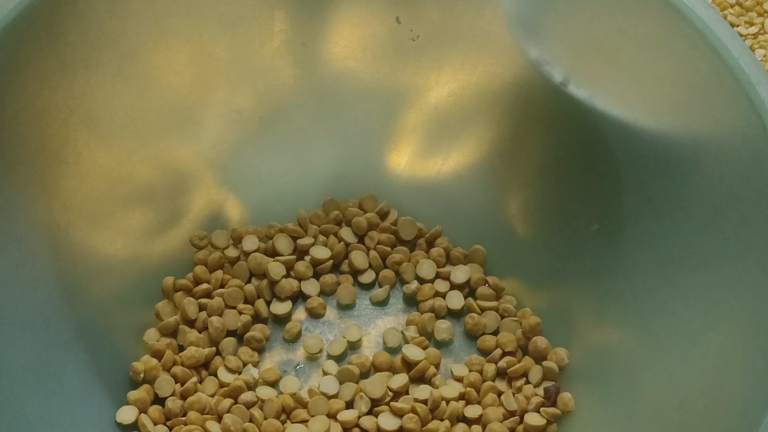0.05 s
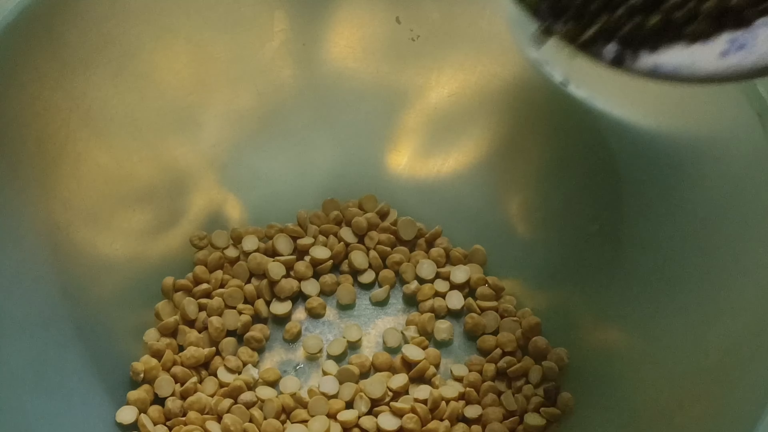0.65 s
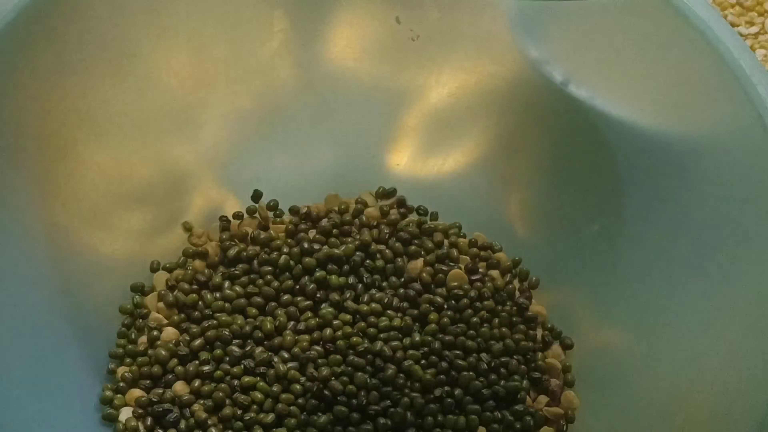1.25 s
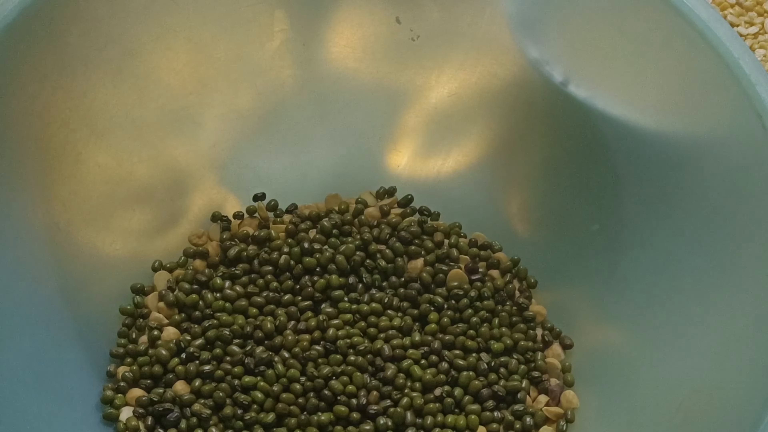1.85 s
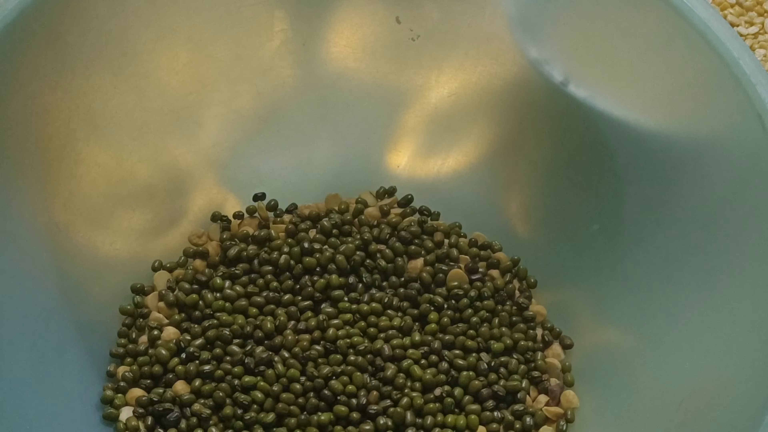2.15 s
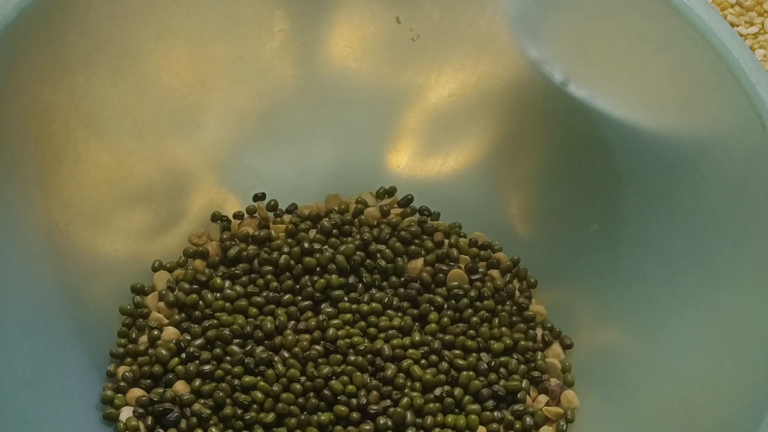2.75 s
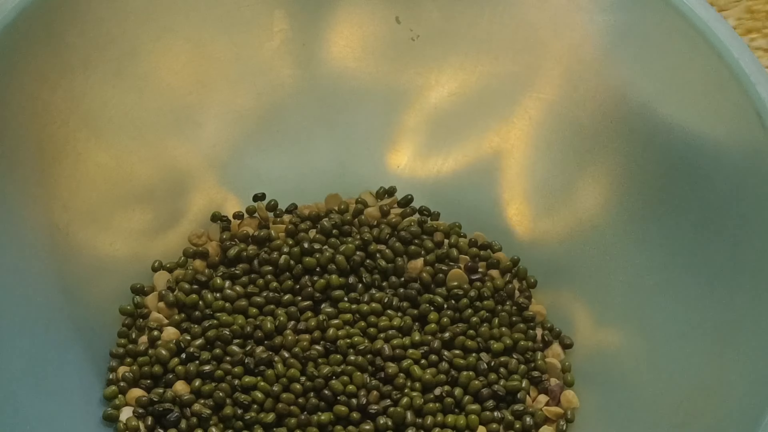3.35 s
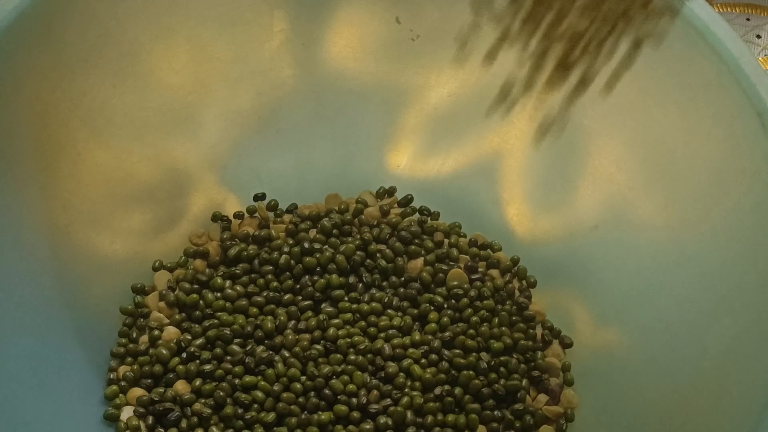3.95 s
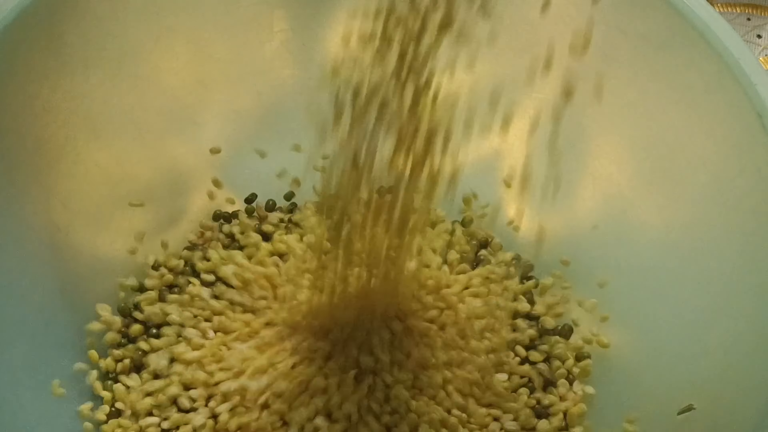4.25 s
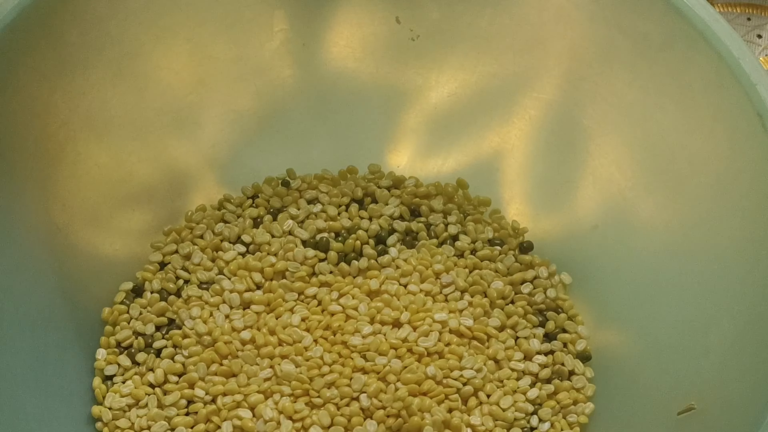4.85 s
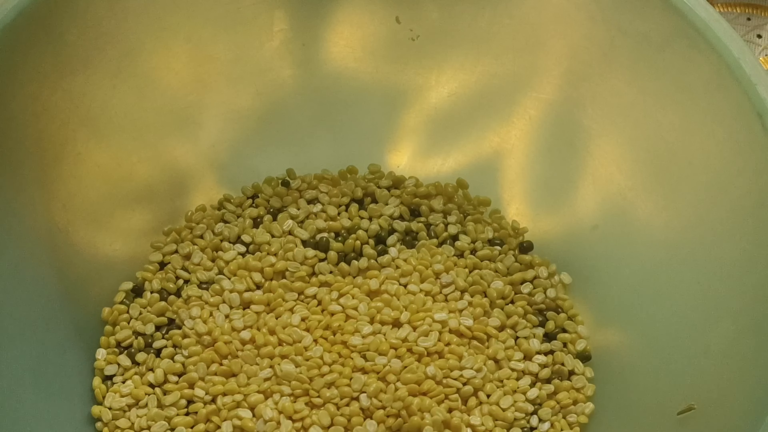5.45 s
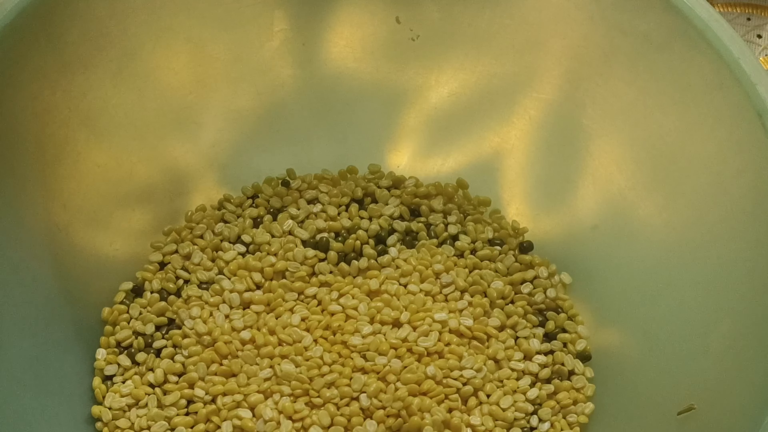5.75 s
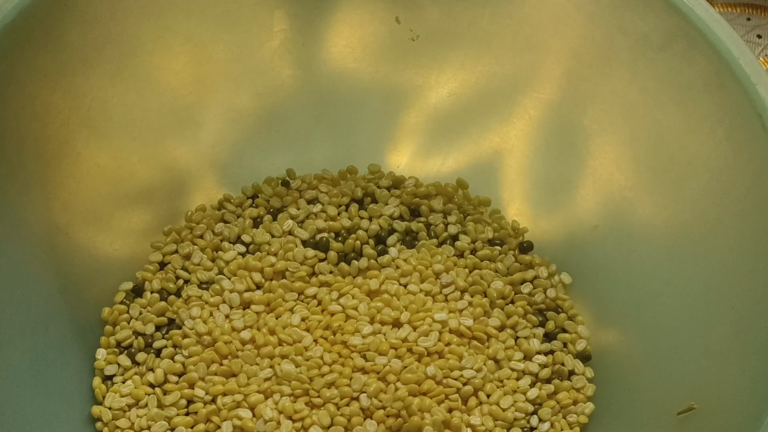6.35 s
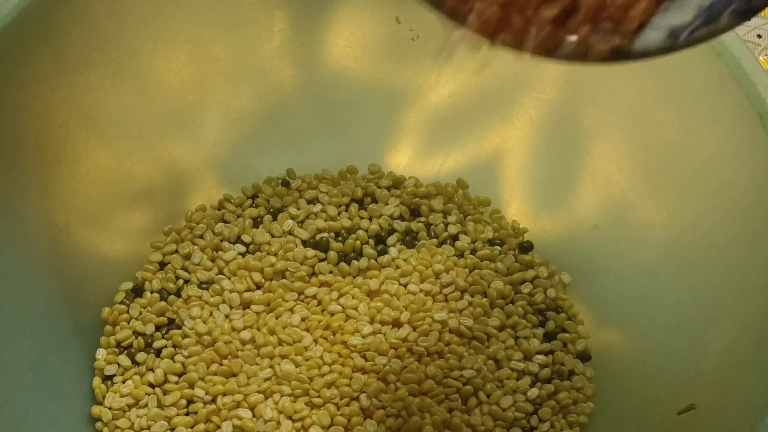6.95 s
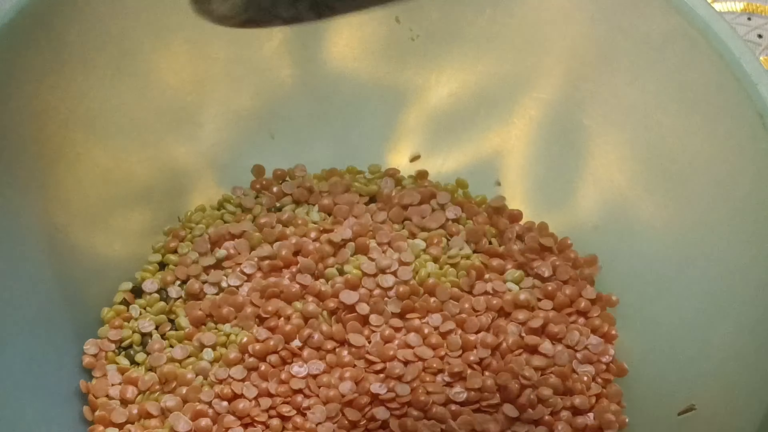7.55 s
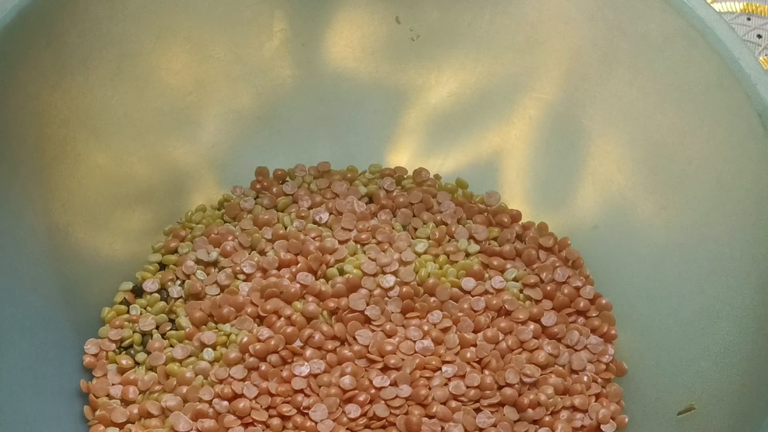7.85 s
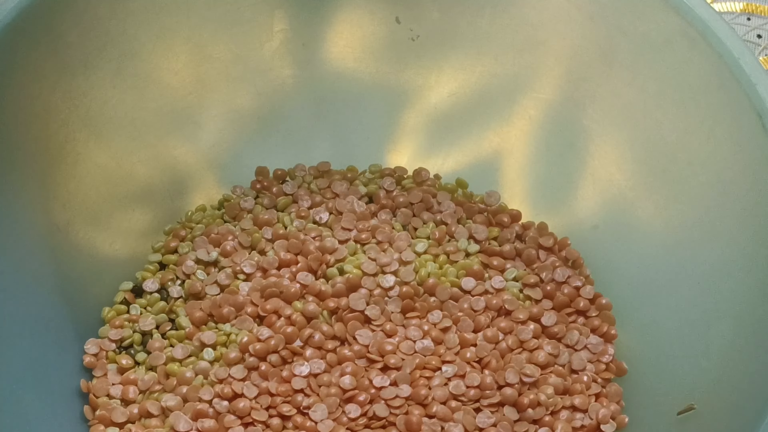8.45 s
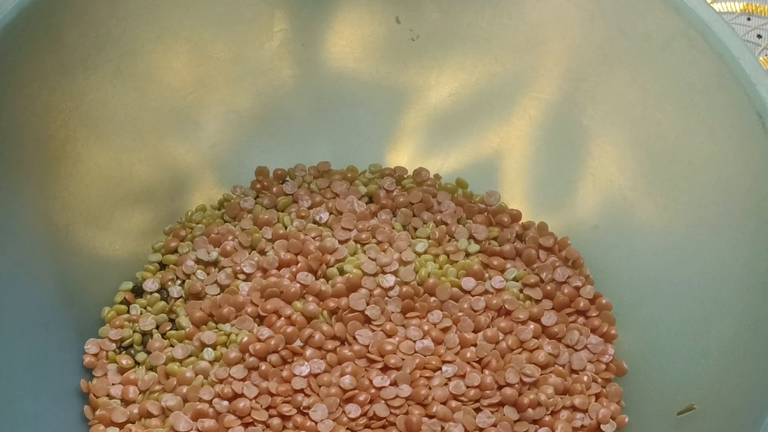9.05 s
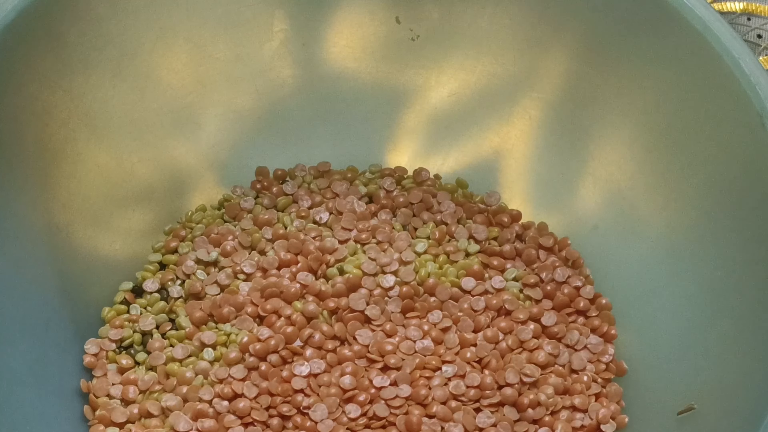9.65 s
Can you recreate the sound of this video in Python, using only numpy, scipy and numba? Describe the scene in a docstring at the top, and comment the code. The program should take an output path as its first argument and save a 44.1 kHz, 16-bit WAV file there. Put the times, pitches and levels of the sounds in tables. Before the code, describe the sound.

Dry lentils rattle into a large plastic bowl in three short pours, with light scrapes, ticks and cup knocks over a low hum.

```python
"""Dry lentils rain from a cup into a large plastic bowl in three short pours, close to a stereo microphone.
Each time they first scrape along the cup wall and ring the air in the cup, then hail onto the heap
and ring the bowl's floor and walls. Between and after the pours, stray lentils tick and the cup is
knocked on the left; once, a hand bumps the bowl. The room is a small kitchen with a short tail,
and a motor hums behind it all over a steady rush of air."""
import sys
import numpy as np
from scipy import signal
from scipy.fft import rfft, irfft
from scipy.io import wavfile
from numba import njit

SR = 44100
rng = np.random.default_rng(int(sys.argv[2]) if len(sys.argv) > 2 else 0)


def master_out(mix):
    """Clip the mix to full scale and print it as 16-bit PCM to the path in sys.argv[1]."""
    frames = np.transpose(np.atleast_2d(mix))
    ceiling = np.clip(frames, -1, 1)
    pcm = np.round(ceiling * 32767).astype(np.int16)
    wavfile.write(sys.argv[1], SR, pcm)


N = 428652
T = np.arange(N) / SR

# Pours into the bowl. Each row: start in seconds, attack in seconds, time until the ebb in seconds,
# release in seconds, relative level in dB, treble in dB, landings per second, the bowl's first pitch
# in Hz, time to load the bowl in seconds, hollow thud in dB.
BOWL_POURS = [ (0.800, .04, 0.24, 0.32, -18, -1, 22000, 1620, 0.47, 1),
              (4.067, 0.049, 0.19, 0.36, -24, -2.5, 7000, 1390, 0.12, -29),
              (7.104, 0.039, .2, .43, -31, 1.5, 11000, 2300, 0.15, -6), ]
# Single lentils hitting the heap or the bowl. Each row: start in seconds, relative level in dB.
SINGLE_LANDINGS = [(.8055, 1), (.8095, 5), (.8135, -1), (.838, 1), (.843, 4), (4.437, -6), (4.508, -6),
                   (4.517, -13), (4.594, -20.5), (7.111, -17), (7.1205, -10), (7.1542, -9), (7.521, -7),
                   (7.538, -9.5), (7.5735, -14)]
# Colour of the landing lentils, as heard through the microphone. Each row: frequency in Hz, gain in dB.
HEAP_COLOUR = [(500, -4), (2000, -3.5), (2800, -1.5), (3800, 0.5), (4400, 0.5), (5200, 1), (7300, 1.5),
               (8400, -4), (10900, -6.5), (11900, 0), (13500, -0.5), (16000, -5)]
# Low modes of the loaded bowl. Each row: frequency in Hz, width in Hz, gain in dB.
BOWL_MODES = [(297.4, 140, -19), (793, 280, -9.5)]
# Slides in the cup, each ringing it by its own amount. Each row: start in seconds, swell in seconds,
# time until the run-out in seconds, run-out in seconds, relative level in dB, contacts per second,
# low cut in Hz, ring of the cup in dB.
CUP_SLIDES = [ (0.0, 0.0013, 0.0048, 0.041, -51.5, 5400, 2500, 3),
              (0.431, 0.11, 0.42, .05, -44, 8500, 4614, -9), (0.653, 0.12, 0.15, .05, -34, 7600, 4862, -3),
              (2.329, 0.042, .055, 0.033, -58, 1300, 4000, 10),
              (2.456, 0.0062, 0.0076, 0.017, -51.5, 800, 3500, 5),
              (3.734, 0.2, 0.33, 0.043, -41, 12000, 3580, 2.5),
              (4.802, 0.036, .06, 0.041, -58, 1700, 3700, -4),
              (4.91, 0.01, 0.031, 0.1, -57.5, 2000, 3700, -3), (6.717, 0.054, .12, .03, -65, 2000, 3700, 4),
              (6.818, 0.14, .29, .06, -42, 14500, 3500, 6),
              (8.49, 0.11, 0.11, 0.039, -49.5, 1200, 3740, -4),
              (8.643, .008, 0.13, 0.018, -57, 1300, 3700, 11),
              (8.89, 0.023, .025, .07, -54, 3400, 3720, -7), ]
# Single lentils ticking in the cup. Each row: start in seconds, relative level in dB.
CUP_TICKS = [(.399, -50), (0.647, -22), (.658, -33), (0.686, -27.5), (1.308, -32), (1.325, -28),
             (1.33, -25), (2.0363, -47.5), (2.32, -37.5), (2.3797, -37), (2.4624, -33.5), (3.808, -33.5),
             (4.8015, -43), (4.824, -42), (6.8613, -33.5), (7.8565, -45), (8.574, -34), (8.6534, -33),
             (8.684, -35), (8.983, -28.5)]
# Colour of the dry scrape, as heard through the microphone. Each row: frequency in Hz, gain in dB.
SCRAPE_COLOUR = [(2500, -24), (3700, -10), (5200, -7), (6000, -2), (7900, -1), (9000, -7), (11200, -7),
                 (12000, -1), (13500, -4), (16000, -6)]
# Resonances of the air in the cup. Each row: frequency in Hz, width in Hz, gain in dB.
CUP_AIR_MODES = [(4070, 170, 8), (6290, 190, 8), (6930, 240, 7), (8300, 220, 1), (9900, 260, -6),
                 (11980, 280, 1), (13500, 400, -6)]
# Knocks on the cup. Each row: start in seconds, level in dB, pitch in Hz, swell in seconds,
# then the offsets in dB of the crack and of the lingering note.
CUP_KNOCKS = [(1.9553, -14.5, 1237, 0.0027, -23.5, -34), (2.2211, -8.5, 1082, 0.0024, -15, -22.5),
              (2.461, -28.5, 890, 0.0012, -16, -22), (8.7225, -18, 1092, 0.0032, -13.5, -17),
              (8.766, -11.5, 1113, 0.0025, -17, -28), (8.7768, -21, 1260, 0.0042, -10, -24)]
# Modes of the cup wall under a knock. Each row: frequency in Hz, width in Hz, gain in dB.
CUP_WALL_MODES = [(1980, 430, 7), (2460, 160, 2), (3750, 300, -0.5), (6650, 270, 1.5), (7630, 560, -3),
                  (9510, 220, -7), (12580, 630, -29.5)]
# Soft bumps of a hand on the bowl. Each row: start in seconds, level in dB, pitch in Hz.
HAND_BUMPS = [(3.245, -40.5, 148), (3.249, -42.5, 241)]
# Partials of the motor's hum. Each row: multiple of the shaft rate, rms level in dB.
MOTOR_PARTIALS = [(1, -57), (2, -64), (3, -54.5), (5, -63), (6, -63), (8, -72)]
# Colour of the room tone, mid and side. Each row: frequency in Hz, relative level in dB.
AIR_MID_COLOUR = [(25, -19), (70, -16.5), (92, 5.5), (140, 1), (195, -7), (260, -4), (480, -5), (700, -5.5),
                  (1400, -14), (3000, -21.5), (5600, -35.5), (7400, -31.5), (9500, -45.5), (16000, -46.5)]
AIR_SIDE_COLOUR = [(25, -44.5), (120, -16.5), (300, -10.5), (650, 3.5), (1000, -1.5), (1800, -8.5),
                   (3000, -18.5), (5600, -30.5), (7400, -27), (9000, -43), (11000, -41.5), (12200, -41),
                   (16000, -55)]


def pouring(loaded_hz=2130, body_db=7, treble_db=8.5, dulling=.193, thud_fade_db_per_s=27):
    """Lentils rain on the heap, just right of centre; the bowl's floor rings, weak below its pitch."""
    hail, floor_hz, thud_gain = np.zeros((2, N)), np.full(N, float(loaded_hz)), np.zeros(N)
    for start, attack_s, ebb_s, release_s, db, bright_db, per_s, first_hz, load_s, thud_db in BOWL_POURS:
        span, age = since(start)
        ebb_db = -37.5 * (np.maximum(age - ebb_s, 0) / release_s) ** 2.13  # a pour ends ever faster
        flow = (1 - np.exp(-age / attack_s)) * undb(db + ebb_db)
        hits = contacts(len(age), per_s, spread_db=3.3)
        body = signal.sosfiltfilt(signal.butter(2, 8000, fs=SR, output="sos"), hits)
        # harder landings are brighter; the stragglers land softly
        treble = undb(treble_db + bright_db + dulling * ebb_db) * (hits - body)
        hail[:, span] = flow * (undb(body_db) * body + treble)
        floor_hz[span] = first_hz + (loaded_hz - first_hz) * ease(age / load_s)
        thud_gain[span] = undb(thud_db - thud_fade_db_per_s * age)
    singles = undb(-1) * strikes(SINGLE_LANDINGS, chatter_s=.0018, chatter_db=5)
    heap = ring(hail + singles, click(HEAP_COLOUR))
    rattle = np.array([resonant_highpass(side, floor_hz, damping=.26) for side in heap])
    rattle = np.array([resonant_highpass(side, .85 * floor_hz, damping=1.69) for side in rattle])
    # the bowl also gives a hollow thud, set per pour and fading as it runs
    hollow = band(heap, (1250, 1950), "bandpass", order=1)
    thud = thud_gain * band(hollow, 560, "highpass")
    low_ring = ring(heap, resonances(BOWL_MODES))
    return pan(bowl_walls(rattle - thud + low_ring), right_db=2)


def bowl_walls(x, bounce_db=-8, fade_s=.005, size=900):
    """Sound bounces to and fro inside the bowl, which gives every click the same short, hollow ring."""
    t = np.arange(size) / SR
    bounces = rng.standard_normal((2, size)) * np.exp(-t / fade_s) * (t > .001)
    return (x + ring(x, at_energy(bounces, bounce_db))) / np.sqrt(1 + undb(bounce_db) ** 2)


def sliding(gain_db=4):
    """Lentils scrape and tick along the tilted cup, near centre: each slide swells and runs out."""
    out = np.zeros((2, N))
    middles = np.array([start + length_s / 2 for start, _, length_s, *_ in CUP_SLIDES])
    for k, (start, swell_s, length_s, run_out_s, db, per_s, low_hz, ring_db) in enumerate(CUP_SLIDES):
        # a tick rings the cup as the nearest slide does
        ticks = [tick for tick in CUP_TICKS if np.argmin(abs(middles - tick[0])) == k]
        force = undb(-1) * strikes(ticks, chatter_s=.003, chatter_db=15.5)
        span, age = since(start)
        flow = ease(age / swell_s) * np.exp(-np.maximum(age - length_s, 0) / run_out_s)
        force[:, span] += undb(gain_db + db) * flow * contacts(len(age), per_s, spread_db=1)
        out += ring(force, cup_response(low_hz, ring_db))
    return pan(out, right_db=1)


def cup_response(low_hz, ring_db):
    """One contact inside the cup: a dry scrape plus the ring of the air in it; energy 1."""
    contact = click(SCRAPE_COLOUR) + undb(ring_db) * resonances(CUP_AIR_MODES)
    response = band(contact, low_hz, "highpass", order=4)
    return response / np.sqrt(np.sum(response ** 2))


def contacts(length, per_s, spread_db, max_count=30000, max_lag=16):
    """A hail of tiny impacts, rms 1; each has its own place and so its own lag between the capsules."""
    when, strength, polarity, place = rng.random((max_count, 4))[:int(per_s * length / SR)].T
    at = (when * (length - 2 * max_lag)).astype(int) + max_lag
    force = undb(spread_db * np.minimum(-np.log(1 - strength), 5)) * np.sign(polarity - .5)
    lag = np.round((2 * place - 1) * max_lag).astype(int)
    return unit(np.array([np.bincount(at, force, length), np.bincount(at + lag, force, length)]))


def strikes(rows, chatter_s, chatter_db, size=2048):
    """Single impacts, each a sharp spike with a short chatter as it settles."""
    out, t = np.zeros((2, N)), np.arange(size) / SR
    for start, db in rows:
        hit = at_energy(rng.standard_normal((2, size)) * np.exp(-t / chatter_s), chatter_db)
        hit[[0, 1], rng.integers(0, 10, 2)] += 1  # the spike, timed apart for each capsule
        at = int(start * SR)
        out[:, at:at + size] += undb(db) * hit
    return out


def knocking(far_db=-8, far_lag_s=.00029, linger_s=.038):
    """The cup is knocked left of the microphone: a hollow note lingers under the clack of its wall."""
    note, cracks = np.zeros(N), []
    for start, db, hz, swell_s, crack_db, linger_db in CUP_KNOCKS:
        note += hollow_note(start, db, hz, swell_s) + hollow_note(start, db + linger_db, hz, linger_s)
        cracks.append((start + .0006, db + crack_db))
    force = strikes(cracks, chatter_s=.0025, chatter_db=11)
    clack = undb([[12], [9]]) * ring(force, resonances(CUP_WALL_MODES))
    far_note = undb(far_db) * np.interp(T - far_lag_s, T, note)
    return np.array([note, far_note]) + clack


def bumping():
    """A hand bumps the bowl: soft, low notes, dead centre."""
    return sum(hollow_note(start, db, hz, swell_s=.011) for start, db, hz in HAND_BUMPS)


def hollow_note(start, db, hz, swell_s, size=8192):
    """One struck mode builds to its peak at swell_s and dies away."""
    note, t = np.zeros(N), np.arange(size) / SR
    envelope = (t / swell_s * np.exp(1 - t / swell_s)) ** 2
    at = int(start * SR)
    note[at:at + size] = undb(db) * envelope * np.sin(2 * np.pi * hz * t)
    return note


def kitchen(x, wet_db, t60_s, echo_s, echo_db, size=22050):
    """Direct sound, an early bounce off the near surfaces, then a short, dull tail from all sides."""
    t = np.arange(size) / SR
    tail = rng.standard_normal((2, size)) * np.exp(-np.log(1000) * t / t60_s) * (t > .005)
    tail = band(at_energy(tail, wet_db), 7000, "lowpass", order=1)
    mid = x.sum(0) / np.sqrt(2)
    echo = undb(echo_db) * np.roll(x, int(echo_s * SR), axis=1)
    return x + echo + ring(np.tile(mid, (2, 1)), tail)


def motor(shaft_hz=56.2):
    """A motor hums in the background; each partial flutters slightly in level and phase."""
    hum = np.zeros(N)
    for multiple, db in MOTOR_PARTIALS:
        amplitude = np.sqrt(2) * undb(db + 1.3 * wander(per_s=12))
        drift = .3 * wander(per_s=7)
        hum += amplitude * np.sin(2 * np.pi * (multiple * shaft_hz * T + rng.random()) + drift)
    return hum


def room_tone(rms_db=-47.5):
    """A steady rush of air all round the microphone, with mid and side equally loud."""
    mid, side = (unit(irfft(rfft(rng.standard_normal(N)) * gains(colour, N), N))
                 for colour in (AIR_MID_COLOUR, AIR_SIDE_COLOUR))
    return undb(rms_db) * np.array([mid + side, mid - side])


def undb(db):
    """Decibels to gain."""
    return 10 ** (np.asarray(db) / 20)


def unit(x):
    """Scale to rms 1."""
    return x / np.sqrt(np.mean(x ** 2))


def at_energy(x, db):
    """Scale a stereo pair to a mean energy per channel, in dB."""
    return x * undb(db) / np.sqrt(np.sum(x ** 2) / 2)


def pan(x, right_db):
    """Tip the balance to the right by right_db."""
    return x * undb([[-right_db / 2], [right_db / 2]])


def gains(colour, size):
    """Gain of a (Hz, dB) colour on the bins of an FFT."""
    hz, db = np.transpose(colour)
    return undb(np.interp(np.log(np.fft.rfftfreq(size, 1 / SR) + 1), np.log(hz), db))


def click(colour, size=512):
    """Shortest causal click with the given colour."""
    cepstrum = irfft(np.log(gains(colour, size)))
    cepstrum[1:size // 2] *= 2
    cepstrum[size // 2 + 1:] = 0
    return irfft(np.exp(rfft(cepstrum)))


def resonances(modes, size=512):
    """Ring of damped modes after one impact."""
    t = np.arange(size) / SR
    return sum(undb(db) * 2 * np.pi * width / SR * np.exp(-np.pi * width * t) * np.cos(2 * np.pi * hz * t)
               for hz, width, db in modes)


def ring(x, response):
    """Play both channels through an impulse response."""
    return signal.oaconvolve(x, np.atleast_2d(response), axes=1)[:, :x.shape[1]]


def band(x, hz, kind, order=2):
    """Butterworth filter."""
    return signal.sosfilt(signal.butter(order, hz, kind, fs=SR, output="sos"), x)


@njit
def resonant_highpass(x, hz, damping):
    """State-variable high-pass whose corner follows hz."""
    high, band_state, low_state = np.empty(len(x)), 0., 0.
    for i in range(len(x)):
        g = np.tan(np.pi * hz[i] / SR)
        mid = (band_state + g * (x[i] + 1e-18 - low_state)) / (1 + g * (g + damping))
        low = low_state + g * mid
        high[i] = x[i] - damping * mid - low
        band_state, low_state = 2 * mid - band_state, 2 * low - low_state
    return high


def wander(per_s):
    """Slow random wander with a spread near 1."""
    knots = rng.standard_normal(400)
    return np.sqrt(3 / 2) * np.interp(T * per_s, np.arange(len(knots)), knots)


def ease(x):
    """Smooth step from 0 to 1 as x goes from 0 to 1."""
    return np.sin(np.pi / 2 * np.clip(x, 0, 1)) ** 2


def since(start, longest_s=.8):
    """The samples of one pour or slide, and their age in seconds."""
    span = (T >= start) & (T < start + longest_s)
    return span, T[span] - start


def scene():
    """The lentils are close to the microphone; the knocks carry further into the room."""
    lentils = kitchen(sliding() + pouring(), wet_db=-10, t60_s=.25, echo_s=.003, echo_db=-23)
    knocks = kitchen(knocking(), wet_db=-3, t60_s=.29, echo_s=.01, echo_db=-14)
    return lentils + knocks + bumping() + motor() + room_tone()


def record(dry, top_hz=15850, ceiling=.9):
    """The recorder rounds the highest peaks and cuts the top, before and after."""
    top_cut = signal.ellip(10, .1, 80, top_hz, fs=SR, output="sos")
    heard = signal.sosfilt(top_cut, dry)
    rounded = heard / (1 + (heard / ceiling) ** 6) ** (1 / 6)
    return signal.sosfilt(top_cut, rounded)


dry = scene()
out = record(dry)
master_out(out)
```